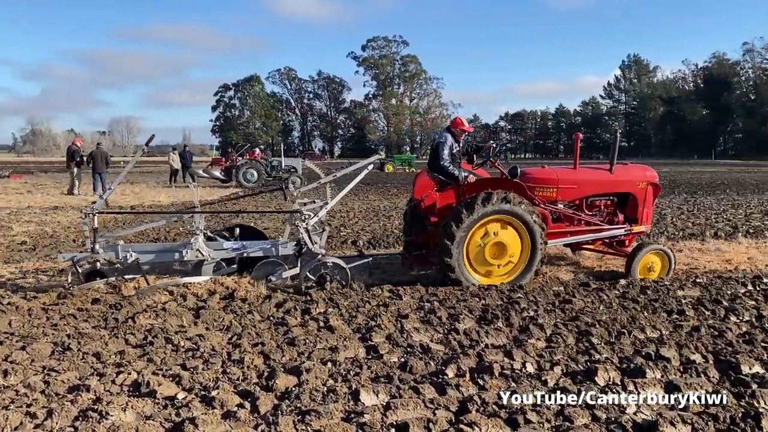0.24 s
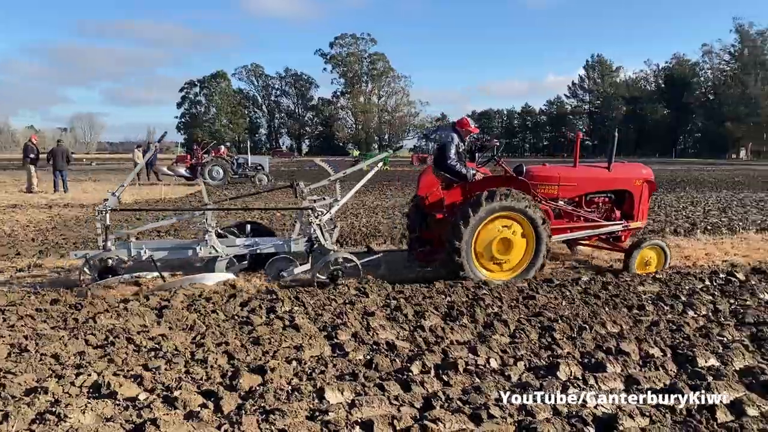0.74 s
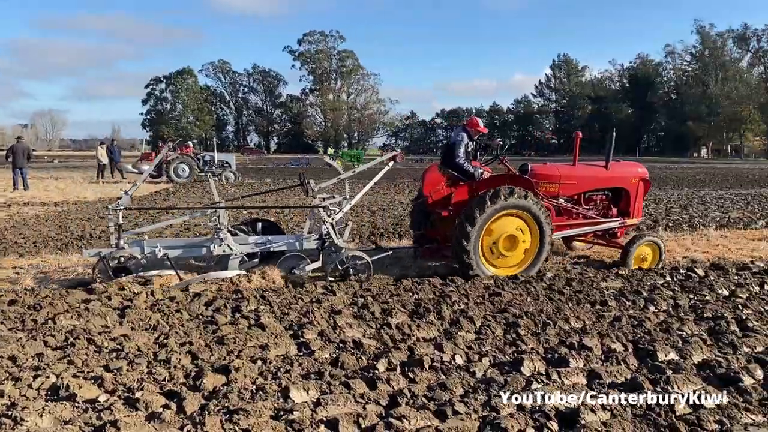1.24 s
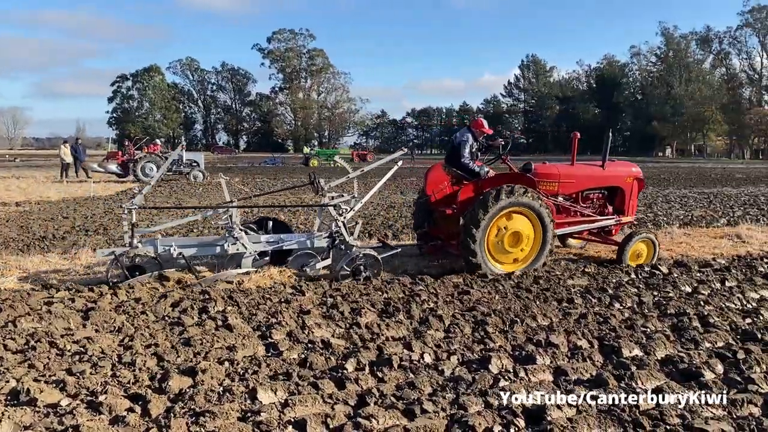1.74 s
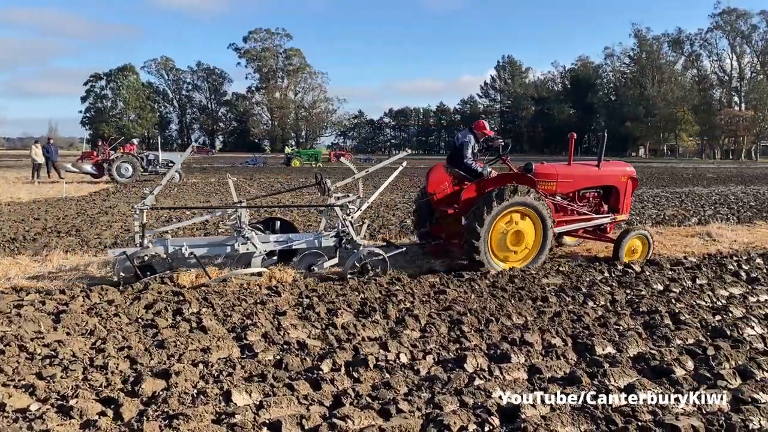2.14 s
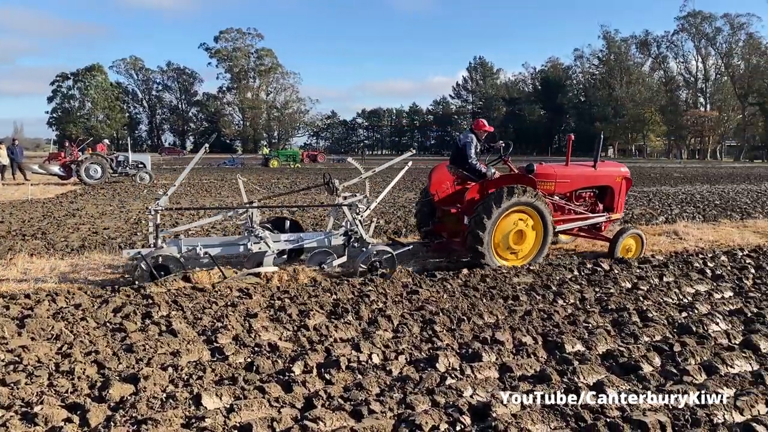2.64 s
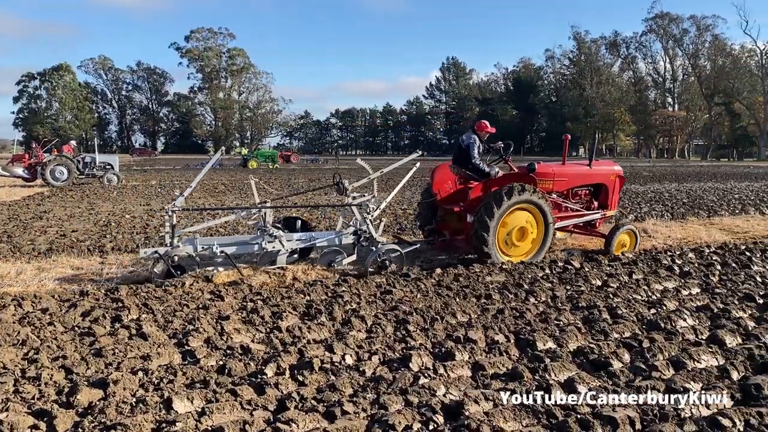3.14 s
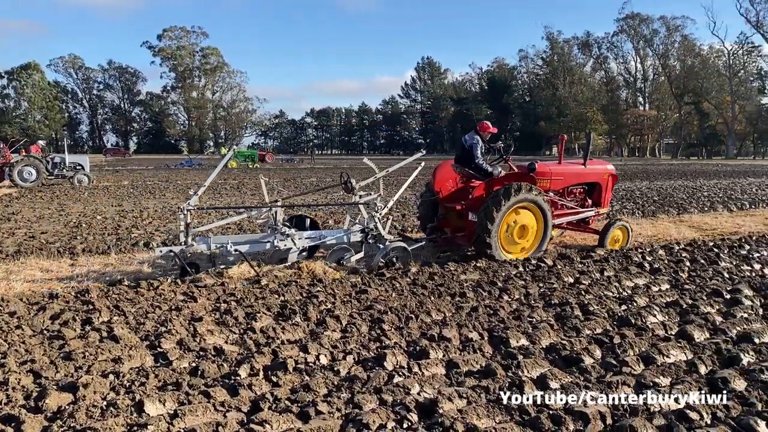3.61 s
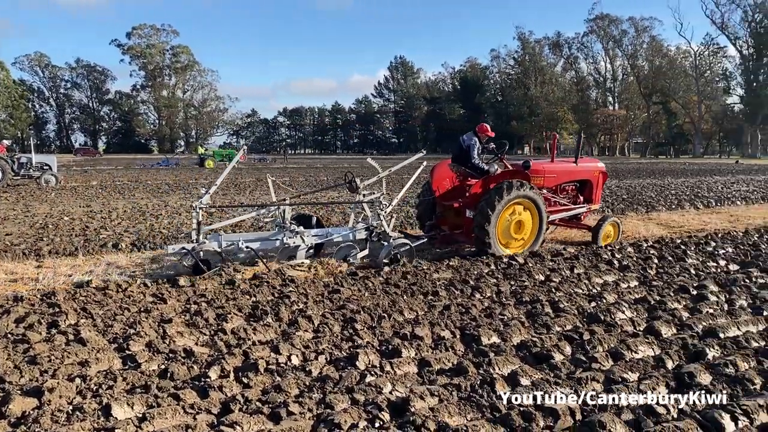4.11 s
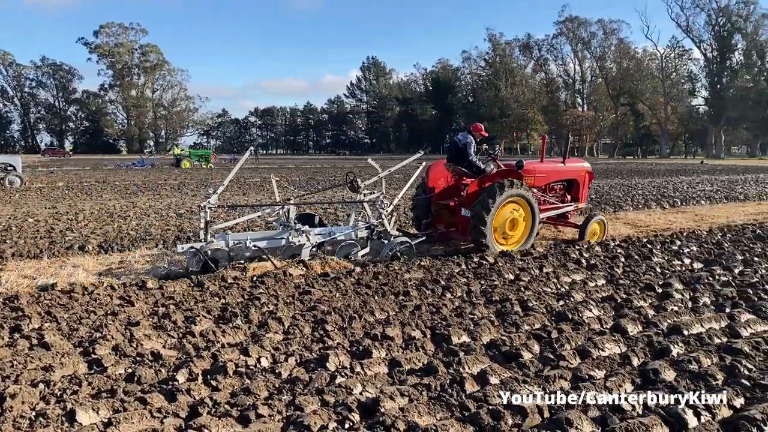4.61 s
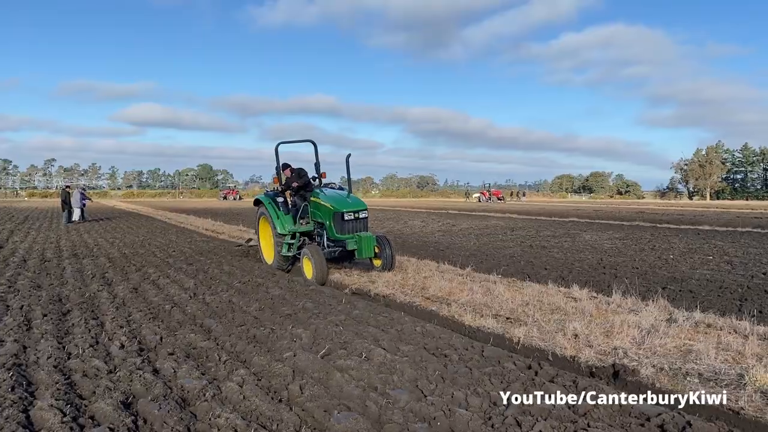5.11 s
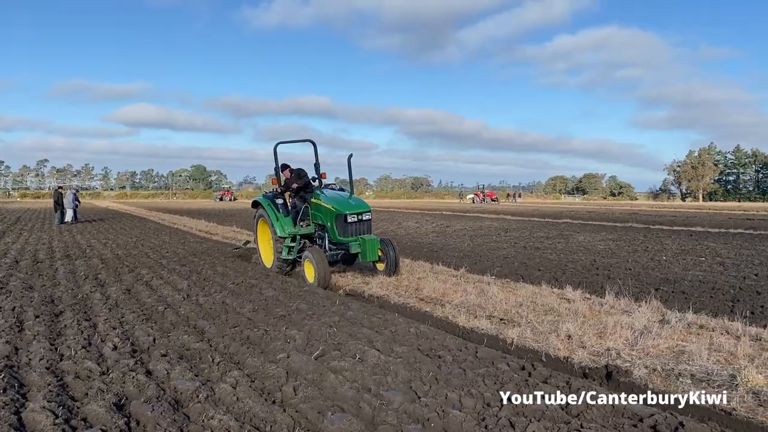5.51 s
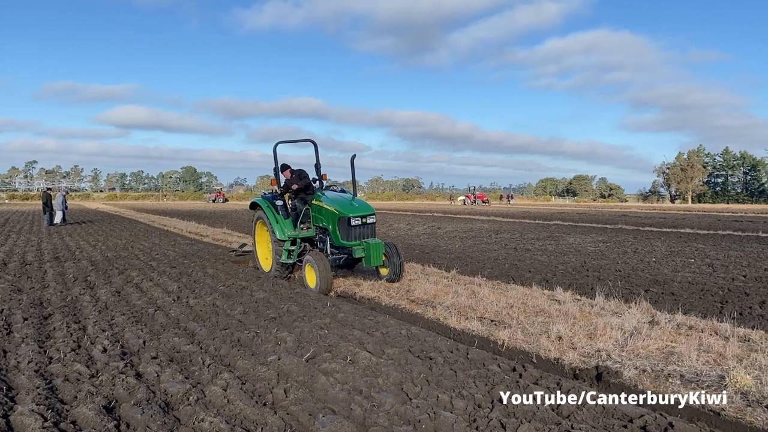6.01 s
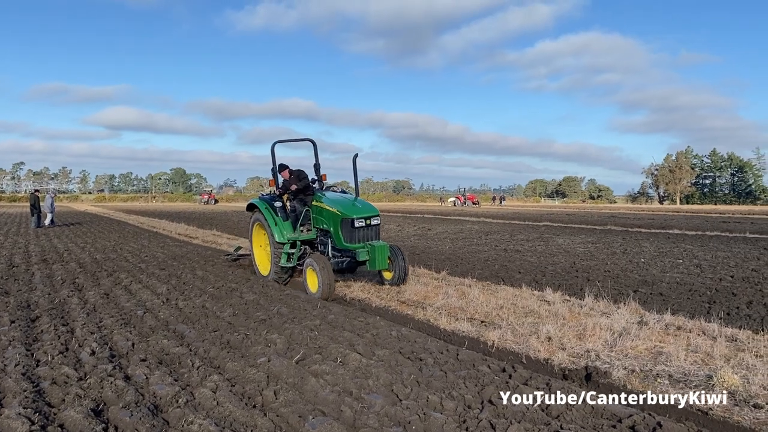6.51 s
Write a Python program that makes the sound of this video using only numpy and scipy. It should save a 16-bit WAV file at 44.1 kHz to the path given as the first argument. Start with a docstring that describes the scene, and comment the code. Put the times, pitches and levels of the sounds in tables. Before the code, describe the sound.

Under gusty wind rumble, an old tractor's chugging, barking exhaust cuts to a modern diesel tractor's fast knocking and gear whine.

```python
"""An old red four-cylinder tractor plods across an open field: each firing puffs from its booming stack,
hard firings bark, and loose metal chinks. Abruptly a modern green diesel takes over and drives closer,
with a fast clatter of combustion and injector knocks under a gear whine. Wind rumbles on the
microphone throughout; its gusts build and break in short thumps as eddies sweep past."""
import sys
import numpy as np
from scipy import signal
from scipy.fft import rfft, irfft
from scipy.io import wavfile

SR = 44100
rng = np.random.default_rng(int(sys.argv[2]) if len(sys.argv) > 2 else 0)


def store_wav(level_fs):
    """Save 16-bit WAV to argv[1]."""
    pcm = np.round(np.clip(np.atleast_2d(level_fs), -1, 1) * 32767)
    wavfile.write(sys.argv[1], SR, pcm.T.astype(np.int16))


N = 297675
TIME = np.arange(N) / SR
FREQS = np.fft.rfftfreq(N, 1 / SR)
HANDOVER_S = 4.912  # red tractor out, green tractor in


def undb(db):
    """Decibels to gain."""
    return 10 ** (np.asarray(db) / 20)


def unit(x):
    """Scale to rms 1."""
    return x / np.sqrt(np.mean(x ** 2))


def curves(table):
    """Each column of a time table at every sample."""
    s, *columns = np.transpose(table)
    return [np.interp(TIME, s, c) for c in columns]


def over_hz(table):
    """A frequency table at every bin, joined on a log axis."""
    hz, value = np.transpose(table)
    return np.interp(np.log(FREQS + 1), np.log(hz), value)


def equalise(x, eq):
    """Shape a sound with a causal EQ curve and bring it to rms 1."""
    cepstrum = irfft(np.log(undb(over_hz(eq))), N)
    cepstrum[1:N // 2] *= 2
    cepstrum[N // 2:] = 0
    return unit(irfft(rfft(x) * np.exp(rfft(cepstrum)), N))


def noise():
    """Two unrelated white noises."""
    return rng.standard_normal((2, N))


def wander(hz, limit=1.5):
    """Smooth random drift of rms 1, up to about hz, without extreme swings."""
    drift = unit(irfft(rfft(rng.standard_normal(N)) * np.exp(-(FREQS / hz) ** 2), N))
    return unit(np.tanh(drift / limit))


def burst(age, rise_s, decay_s):
    """Envelope that swells quickly and dies away."""
    return (1 - np.exp(-(age / rise_s) ** 2)) * np.exp(-age / decay_s)


def spread(pair, width):
    """Blend two unrelated sounds into left and right with the given correlation."""
    correlation = np.clip(over_hz(width), -1, 1)
    mid, side = rfft(pair) * np.sqrt([1 + correlation, 1 - correlation]) / np.sqrt(2)
    return irfft(np.array([mid + side, mid - side]), N)


def place(pair, pan, phase):
    """Place a source by level and phase differences between the two microphone ports."""
    half = np.array([[1], [-1]]) / 2
    return irfft(rfft(pair) * undb(half * over_hz(pan)) * np.exp(1j * half * over_hz(phase)), N)


# Stereo width of the wind: freq_hz, correlation
WIND_WIDTH = [(60, .7), (130, .6), (300, .3), (800, .2)]


def air(eq, envelope=1):
    """Turbulent air: shaped noise, wider in the mids than in the bass."""
    return equalise(spread(noise(), WIND_WIDTH) * envelope, eq)


# Eddies that thump the microphone: centre_s, strength_db, top_pitch_hz, tail_share
EDDIES = [(.058, -20, 286, .2), (.49, -22, 260, .2), (0.542, -16.5, 269, .3), (0.6, -16, 270, 0.22),
          (0.96, -13, 353, 0.53), (1.144, -21, 230, .3), (1.263, -11.5, 264, .1), (1.355, -16, 257, .2),
          (1.686, -18.5, 250, .2), (1.788, -6.5, 238, .05), (2.117, -22.5, 334, .1),
          (2.316, -16.5, 318, .1), (2.624, -22, 330, .1), (2.858, -19, 280, .4), (3.311, -8.5, 292, 0.79),
          (3.381, -12.5, 420, 0.32), (3.448, -11, 370, 1), (3.521, -13, 300, .5), (3.577, -20, 456, .4),
          (3.746, -15, 383, .4), (3.842, -16, 130, .4), (3.92, -17, 296, .4), (3.978, -19.5, 474, .2),
          (4.041, -24, 306, .2), (4.136, -21, 131, 0.34), (4.243, -18, 161, 0.36), (4.28, -17, 330, .2),
          (4.325, -16, 203, .2), (4.370, -10, 260, .2), (4.406, -8, 297, .05), (4.474, -17, 230, .3),
          (4.529, -16, 127, 0.33), (4.645, -14.5, 218, 0.44), (4.702, -10, 263, 1), (4.849, -17, 496, .3),
          (4.866, -15.5, 250, 0.43), (4.91, -16.5, 524, 0.42), (5.154, -18.5, 170, .3),
          (5.181, -15.5, 241, .1), (5.452, -21, 337, .2), (5.499, -21, 455, .3), (5.514, -12, 100, 0.59),
          (5.606, -19, 300, .4), (6.132, -18, 303, 0.75), (6.167, -13, 300, .3), (6.384, -19, 347, .2),
          (6.661, -19.5, 170, .6)]
# Tone of the swirl in a thump: freq_hz, gain_db
SWIRL_EQ = [(80, 4.5), (240, -13), (450, -4), (900, -27), (3000, -36), (12000, -77)]


def thumps(rest_hz=70, pass_s=0.0032, fade_s=0.0052, thump_db=-2, swirl_db=-15, swirl_s=0.01, lead_s=0.0078):
    """An eddy sweeps by behind a ragged swirl: pressure swings fastest when closest, then rings on low."""
    out = np.zeros((2, N))
    swirl = air(SWIRL_EQ)
    rough, stray_rad = undb(2.5 * wander(266)), .3 * wander(310)
    port_phases = 0.75 * rng.standard_normal((len(EDDIES), 2, 1))
    for (s, db, hz, tail), port_rad in zip(EDDIES, port_phases):
        near = slice(int((s - .05) * SR), int((s + .12) * SR))
        age = TIME[near] - s
        swing = 2 * np.pi * (rest_hz * age + (hz - rest_hz) * pass_s * np.arctan(age / pass_s))
        size = 1 / np.cosh(age / fade_s) + tail * burst(np.maximum(age, 0), 0.0057, 0.02)
        pressure = -np.cos(swing + port_rad + stray_rad[near]) * size * rough[near]
        ragged = swirl[:, near] * np.exp(-((age + lead_s) / swirl_s) ** 2)
        out[:, near] += undb(db) * (undb(thump_db) * pressure + undb(swirl_db) * ragged)
    return out


def gusts(build_s=0.046, ease_s=0.033):
    """Envelope of the rough air that builds toward each thump and eases after it."""
    energy = 0
    for s, db, _, _ in EDDIES:
        age = TIME - s
        energy += (undb(db) * np.exp(-np.abs(age) / np.where(age < 0, build_s, ease_s))) ** 2
    return np.sqrt(energy)


# Rise and fall of the breeze: time_s, strength_db
WIND_STRENGTH = [(0, -25.5), (.26, -27.5), (.56, -19.5), (.7, -27), (.9, -27), (1.2, -22.5), (1.44, -27),
                 (1.76, -20.5), (1.87, -30.5), (2.25, -27.5), (2.43, -31), (2.8, -21.5), (3.0, -25),
                 (3.27, -26), (3.65, -27.5), (4.15, -25), (4.55, -30.5), (4.78, -31.5), (4.93, -23.5),
                 (5.05, -29), (5.4, -31.5), (5.55, -22.5), (5.85, -34.5), (6.06, -34.5), (6.14, -29),
                 (6.75, -25)]
# Tone of its turbulence, the rasp of its faster eddies and its deep rumble: freq_hz, gain_db
TURBULENCE_EQ = [(30, -20.5), (60, -7), (105, 2), (160, -5), (235, -8.5), (350, -15), (700, -37),
                 (2000, -64), (12000, -100)]
RASP_EQ = [(100, -26), (250, -10), (340, -8), (480, -5.5), (800, -19.5), (2000, -36), (12000, -99)]
RUMBLE_EQ = [(20, -42), (35, -16), (52, -1), (72, 0), (110, -9), (200, -30), (2000, -90)]


def wind(turbulence_db=-1, gust_db=-22, rasp_db=-45, gust_rasp_db=-24, rumble_db=-28):
    """Wind tumbles over the ports in quick uneven surges; its rasp and rumble grow with its strength."""
    (strength_db,), gust = curves(WIND_STRENGTH), gusts()
    excess_db = strength_db - strength_db.mean()
    surges = undb(3.5 * wander(25))
    turbulence = np.hypot(undb(strength_db + turbulence_db), undb(gust_db) * gust)
    rasp = np.hypot(undb(rasp_db + 0.12 * excess_db), undb(gust_rasp_db) * gust)
    rumble = undb(rumble_db + 0.86 * excess_db)
    return turbulence * air(TURBULENCE_EQ, surges) + rasp * air(RASP_EQ, surges) + rumble * air(RUMBLE_EQ)


# Stereo width of both engines: freq_hz, correlation
ENGINE_WIDTH = [(60, .95), (400, 0.6), (700, 0.72), (1400, 0.77), (3000, 0.8), (5200, 0.48), (7000, 1),
                (16000, 1)]


def rattle(cycles, cycle_hz, repeat):
    """Stereo noise of which a share comes back alike on every engine cycle."""
    looped = noise()[:, (cycles % 1 * SR / cycle_hz).astype(int)]
    return spread(np.sqrt(repeat) * looped + np.sqrt(1 - repeat) * noise(), ENGINE_WIDTH)


def rings(blows, modes, vary_db):
    """Damped modes, each struck with its own changing strength."""
    age = TIME[:N // 50]
    out = 0
    for hz, decay_s, db in modes:
        ring = np.sin(2 * np.pi * hz * age) * np.exp(-age / decay_s)
        strikes = blows * undb(vary_db * wander(26))
        out += undb(db) * unit(signal.fftconvolve(strikes, ring[None], axes=1)[:, :N])
    return unit(out)


# Bed of gear and fan tones: pitch_hz, gain_db
WHINE_TONES = [(1308, -46.5), (1360, -45), (1529, -47.5), (1610, -49), (1744, -44), (2164, -47),
               (2627, -48), (3047, -60), (6206, -60.5), (15336, -68)]
# The lead whine, which swells, then sags: time_s, pitch_hz, level_db
LEAD_WHINE = [(4.9, 904, -52), (5.5, 912, -44), (6.15, 911, -44.5), (6.4, 908, -43), (6.75, 884, -45)]


def gear_whine(cycles, cycle_hz, bed_db=-4.5):
    """The green tractor's gears and fan sing wavering tones that follow the engine, under one lead tone."""
    bed = 0
    for hz, db in WHINE_TONES:
        level = undb(db + bed_db + 2.5 * wander(19))
        bed += level * np.sin(2 * np.pi * hz * cycles / cycle_hz + 1.2 * wander(14))
    hz, db = curves(LEAD_WHINE)
    lead = undb(db + 3 * wander(21)) * np.sin(2 * np.pi * np.cumsum(hz) / SR + 0.42 * wander(15))
    return np.sqrt(2) * (bed + lead)


# Knock rhythm of one engine cycle: position_cycles, accent_db
KNOCK_PATTERN = [(.175, 0), (.395, 1.5), (.58, -1.5), (.78, -5), (.98, 1.5)]
# Ring of the block, one list per knock: pitch_hz, decay_s, gain_db
KNOCK_MODES = [
    [(903, 0.013, -2.5), (1697, 0.009, -4), (2105, 0.0067, -6), (2670, .003, 0)],
    [(1345, 0.0088, 2), (1950, 0.0033, 1.5), (3040, 0.002, -8.5)],
    [(990, 0.0037, 2), (1650, 0.01, -2), (1910, 0.0044, -7), (3050, .003, -12)],
    [(715, 0.0063, 5.5), (2910, 0.0067, -11)],
    [(680, 0.0073, -4), (1761, 0.012, 2.5), (2610, 0.0081, -9), (3255, 0.0055, -6.5)],
]
# Tone of the clatter: freq_hz, gain_db
CLATTER_EQ = [(90, -18), (250, -10.5), (400, -4.5), (600, 0.5), (780, -2.5), (950, -7), (1100, -6),
              (1450, -10.5), (1750, -7.5), (2150, -10), (2420, -16), (2750, -12), (3280, -13.5),
              (3650, -20.5), (6000, -27), (7800, -30), (9400, -28), (12500, -40), (15500, -35)]
# The green tractor sits slightly left: freq_hz, left_minus_right_db
GREEN_PAN = [(500, 0), (2200, 2), (3000, 1.5), (5500, 4.5), (7500, 0.5)]
# Its phase between the ports: freq_hz, left_lead_rad
GREEN_PORT_PHASE = [(500, 0), (2000, .8), (5800, 1.4), (6900, 0)]


def green_tractor(cycle_hz=11.395, start_m=12.4, speed_m_per_s=1.25, wash=1.2, ring_db=-6.5):
    """An approaching diesel: combustion and injector knocks repeat each cycle and ring the block."""
    distance_m = np.maximum(start_m - speed_m_per_s * (TIME - HANDOVER_S), 1)
    cycles = cycle_hz * np.cumsum(1 + 0.0018 * wander(2)) / SR
    cycles += cycle_hz * TIME[-1] - cycles[-1]
    contact = rattle(cycles, cycle_hz, repeat=0.6)
    knocks, ringing = 0, 0
    for (position, db), modes in zip(KNOCK_PATTERN, KNOCK_MODES):
        age = (cycles - position + .02) % 1 / cycle_hz
        knocks += undb(db) * burst(age, 0.0019, 0.0026)
        ringing += undb(db) * rings(contact * burst(age, 0.00072, 0.0018), modes, vary_db=1.5)
    clatter = rattle(cycles, cycle_hz, repeat=0.48) * (wash + knocks) * undb(0.7 * wander(90))
    engine = undb(-9) / distance_m * (equalise(clatter, CLATTER_EQ) + undb(ring_db) * unit(ringing))
    drone = np.sqrt(2) * undb(-38) * np.sin(2 * np.pi * len(KNOCK_PATTERN) * cycles)
    return place(engine + gear_whine(cycles, cycle_hz) + drone, GREEN_PAN, GREEN_PORT_PHASE)


# Loose metal shaken by the red tractor: start_s, level_db, pitch_hz
CHINK_HITS = [(4.4800, -38, 3600), (4.5370, -31, 3700), (4.6240, -38, 3730), (4.649, -31, 3700),
              (4.6790, -29, 3530), (4.7075, -31, 3400), (4.7350, -31, 3630), (4.7620, -33, 3530),
              (4.7913, -24.5, 3640), (4.8480, -42, 3650), (4.8755, -31, 3480), (4.9030, -26, 3450)]
# Tone of the tick on each attack: freq_hz, gain_db
TICK_EQ = [(500, -6), (1300, 8), (4000, -13), (5300, -7), (6200, -20), (15000, -24)]


def chinks(rise_s=0.00044, note_s=0.0021, tick_s=0.0025, tick_db=-3, overtone=1.45, overtone_db=-10):
    """A loose metal part is jolted: a dry tick and a brief note with one overtone."""
    out, tick = 0, equalise(spread(noise(), ENGINE_WIDTH), TICK_EQ) * undb(tick_db)
    for s, db, hz in CHINK_HITS:
        age = np.maximum(TIME - s, 0)
        angle = 2 * np.pi * hz * age
        note = np.sin(angle) + undb(overtone_db) * np.sin(overtone * angle)
        out += undb(db) * (burst(age, rise_s, note_s) * note + burst(age, rise_s, tick_s) * tick)
    return out


# Barks of the red tractor's stack: start_s, level_db, pitch_hz
BARK_HITS = [(0.033, -24, 1630), (.092, -27, 1160), (0.12, -25, 1270), (0.148, -26, 1710), (.261, -21, 880),
             (.343, -24, 1400), (.476, -27, 1000), (.585, -25, 1240), (.743, -37, 700), (.953, -25, 1290),
             (2.07, -29, 1080), (2.101, -30, 1160), (2.242, -27, 1070), (2.496, -33, 1500),
             (2.556, -25, 1580), (2.67, -26, 1630), (2.696, -24, 942), (2.752, -26, 845),
             (3.539, -26, 1700), (4.76, -26, 1130)]
# Tone of their crack: freq_hz, gain_db
CRACK_EQ = [(200, -14), (700, 0.5), (1400, 5.5), (2400, -2.5), (3500, -2.5), (6000, -19.5), (15500, -22)]


def barks(rise_s=0.00067, crack_s=0.0037, crack_db=-1.5, ring_s=0.0056, ring_db=-2):
    """A hard firing cracks out of the stack and rings it briefly at a pitch of its own."""
    out, gas = np.zeros((2, N)), equalise(spread(noise(), ENGINE_WIDTH), CRACK_EQ)
    for s, db, hz in BARK_HITS:
        near = slice(int(s * SR), int((s + .05) * SR))
        age = np.maximum(TIME[near] - s, 0)
        crack = burst(age, rise_s, crack_s) * gas[:, near]
        ring = burst(age, rise_s, ring_s) * np.sin(2 * np.pi * hz * age)
        out[:, near] += undb(db) * (undb(crack_db) * crack + undb(ring_db) * ring)
    return out


# At times the puffs smear into a steadier rush: time_s, steady_power_share
PUFF_BLUR = [(.6, 0), (.8, .25), (1.4, .2), (2.1, .18), (2.4, 0)]


def blur(envelope):
    """Let part of the gas flow evenly instead of in puffs; the result has rms near 1."""
    (share,) = curves(PUFF_BLUR)
    return np.sqrt((1 - share) * unit(envelope) ** 2 + share)


# Weight of the puffs, which follows the load: time_s, gain_db
PUFF_LOAD = [(0, -41), (.3, -40.5), (.8, -42.5), (1.25, -44), (1.7, -44), (2.3, -44.5), (2.7, -43),
             (3.2, -44), (3.55, -45), (4.1, -47.5), (4.5, -46), (4.75, -47), (4.9, -43.5)]
# Tone of a puff's body and of its gas hiss: freq_hz, gain_db
PUFF_EQ = [(150, -39), (360, -14), (470, -1.5), (700, 6), (880, -1), (1250, 9), (1480, 5), (1650, 4),
           (2350, -2.5), (3200, -1), (4500, -7), (6000, -13.5), (7500, -9), (10000, -13), (15500, -17.5)]
HISS_EQ = [(1500, -51), (3800, 24), (6000, 25.5), (8000, -19), (11000, 4), (15500, -3)]
# Ring of the stack and bonnet, and hollow ring of the pipe: pitch_hz, decay_s, gain_db
STACK_MODES = [(1094, 0.0085, -3), (1305, 0.016, -6.5), (1636, 0.0079, -1.5), (2052, 0.0098, -4),
               (2644, 0.014, -8.5), (3170, 0.0037, -9.5), (3680, 0.0029, -9)]
PIPE_MODES = [(450, 0.0069, -6), (553, 0.008, 0.5), (629, 0.009, 4.5), (717, .005, -6.5)]
# Rise and fall of the pipe's ring: time_s, level_db
PIPE_LEVEL = [(0, -37), (.4, -35), (.75, -35), (1.0, -40), (1.5, -42), (2.1, -36.5), (2.6, -40.5),
              (3.05, -41.5), (3.9, -42), (4.5, -40.5), (4.9, -42)]


def exhaust(age, strength, cycles, cycle_hz, puff_db=6, hiss_db=-7, ring_db=2, linger=.1, linger_s=.03):
    """Each firing spits a ragged, hissing puff of gas that rings the stack, bonnet and pipe."""
    (load_db,), (pipe_db,) = curves(PUFF_LOAD), curves(PIPE_LEVEL)
    blow = strength * burst(np.maximum(age - .0007, 0), 0.004, 0.0032)
    # some gas keeps flowing between puffs
    flow = blur(blow + linger * np.exp(-age / linger_s)) * undb(2 * wander(350))
    puffs = undb(puff_db) * equalise(rattle(cycles, cycle_hz, repeat=0.12) * flow, PUFF_EQ)
    jet = blur(strength * burst(age, 0.0011, 0.0072))
    hiss = undb(hiss_db) * equalise(noise() * jet * undb(wander(10)), HISS_EQ)
    ringing = undb(ring_db) * rings(spread(noise(), ENGINE_WIDTH) * blur(blow), STACK_MODES, vary_db=3)
    pipe = rings(rattle(cycles, cycle_hz, repeat=0.24) * flow, PIPE_MODES, vary_db=1)
    return undb(load_db) * (puffs + hiss + ringing) + undb(pipe_db) * pipe


# Swells of the boom: time_s, level_db
BOOM_LEVEL = [(0, -29.5), (.09, -18.5), (.24, -21.5), (.36, -15), (.44, -20), (.55, -14), (.65, -27),
              (.77, -28), (.83, -16), (.9, -32), (.96, -17.5), (1.02, -26), (1.1, -12), (1.21, -16.5),
              (1.28, -26), (1.38, -19.5), (1.43, -28), (1.48, -16.5), (1.66, -23), (1.79, -18), (1.86, -42),
              (1.97, -26.5), (2.08, -22), (2.33, -32.5), (2.42, -30), (2.5, -19.5), (2.7, -22.5),
              (2.86, -15), (2.96, -27), (3.1, -21.5), (3.17, -17), (3.29, -15), (3.37, -37.5), (4.78, -29),
              (4.9, -23)]
# Its harmonics: firing_rate_multiple, gain_db
BOOM_HARMONICS = [(1, -20), (2, 0), (3, -13), (4, -21), (6, -20), (7, -26)]


def stack_boom(firings, flutter_db=2.6, drift_rad=.16):
    """The stack booms mainly at twice the firing rate; its level wavers and each side drifts in phase."""
    angle = 2 * np.pi * firings + drift_rad * np.array([wander(20), wander(20)])
    tone = np.sqrt(2) * sum(undb(db) * np.cos(order * angle + np.pi / 4) for order, db in BOOM_HARMONICS)
    return undb(curves(BOOM_LEVEL)[0] + flutter_db * wander(37)) * tone


# Pace of the red engine: time_s, firing_rate_hz
FIRING_RATE = [(0, 34.48), (0.3, 36.46), (0.55, 37.97), (0.9, 37.98), (1.25, 37.02), (1.55, 36.73),
               (1.9, 35.23), (2.05, 36.51), (2.25, 34.64), (2.65, 35.71), (2.95, 36.71), (3.3, 37.13),
               (3.5, 36.6), (3.95, 36.93), (4.3, 35.08), (4.9, 35.91)]
# Punch of each cylinder, in firing order: accent_db
CYLINDER_ACCENTS = [-1.1, 0.19, -0.042, -0.17]
# Tone of the block and gears: freq_hz, gain_db
BLOCK_EQ = [(60, -5), (200, -19), (370, -17), (540, 0), (660, 4.5), (850, 2.5), (1280, -1), (1700, -3.5),
            (2350, -10), (3200, -11), (7000, -18.5), (15500, -35)]
# The red tractor's treble sits left: freq_hz, left_minus_right_db
RED_PAN = [(700, -1), (1300, -1.5), (2400, 3), (4400, 4.5), (8000, 1.5), (15000, -0.5)]
# Its phase between the ports: freq_hz, left_lead_rad
RED_PORT_PHASE = [(100, 0), (4500, -.4), (5600, -3.1), (6900, -6.28)]


def red_tractor(scatter_db=0.9, block_db=-37):
    """Four cylinders fire in turn through a puffing, booming stack; valves clatter between firings."""
    (hz,), cylinders = curves(FIRING_RATE), len(CYLINDER_ACCENTS)
    firings = np.cumsum(hz) / SR + .87
    count, age = firings.astype(int), firings % 1 / hz
    cycles, cycle_hz = firings / cylinders, hz.mean() / cylinders
    accent_db = np.array(CYLINDER_ACCENTS)[(count - 1) % cylinders]
    strength = undb(accent_db + scatter_db * rng.standard_normal(count[-1] + 1)[count])
    puffs = exhaust(age, strength, cycles, cycle_hz)
    valves = (0.44 + burst((firings + .5) % 1 / hz, 0.0033, 0.014)) * undb(1.87 * wander(36))
    block = undb(block_db) * equalise(rattle(cycles, cycle_hz, repeat=0.62) * valves, BLOCK_EQ)
    return stack_boom(firings) + place(puffs + block + barks(), RED_PAN, RED_PORT_PHASE) + chinks()


def scene(crossfade_s=0.0067):
    """The red tractor gives way to the green within a few milliseconds; the wind blows on."""
    green = np.clip((TIME - HANDOVER_S) / crossfade_s + .5, 0, 1)
    return np.sqrt(1 - green) * red_tractor() + np.sqrt(green) * green_tractor() + wind() + thumps()


def record(dry):
    """The microphone delays the left channel's high treble and sheds the deepest bass and the very top."""
    lag_s, lag_above_hz, low_cut_hz, top_hz = .000235, 6900, 31, 15900
    late = np.exp(-2j * np.pi * lag_s * np.maximum(FREQS - lag_above_hz, 0))
    pair = np.array([irfft(rfft(dry[0]) * late, N), dry[1]])
    pair = signal.sosfilt(signal.butter(3, low_cut_hz, "high", fs=SR, output="sos"), pair)
    return signal.sosfilt(signal.ellip(10, .2, 80, top_hz, fs=SR, output="sos"), pair)


dry = scene()
out = record(dry)
store_wav(out)
```